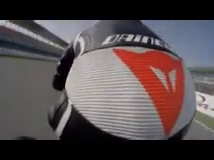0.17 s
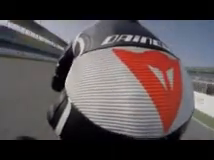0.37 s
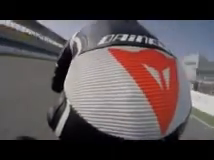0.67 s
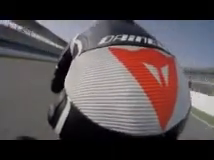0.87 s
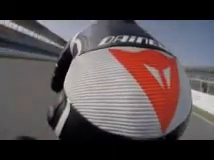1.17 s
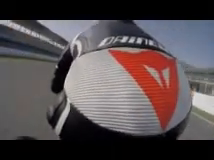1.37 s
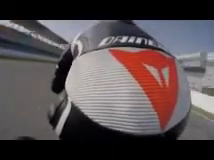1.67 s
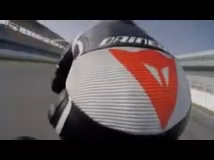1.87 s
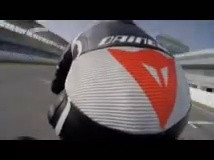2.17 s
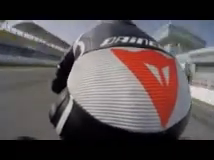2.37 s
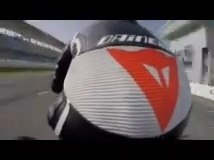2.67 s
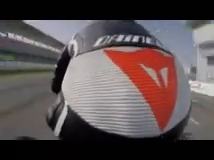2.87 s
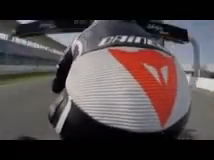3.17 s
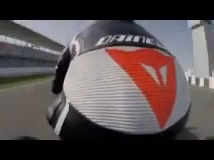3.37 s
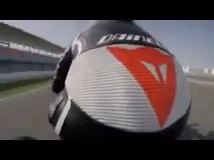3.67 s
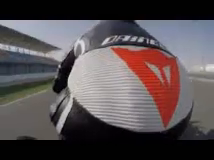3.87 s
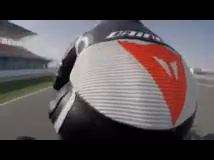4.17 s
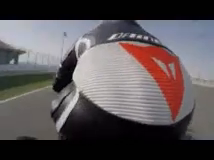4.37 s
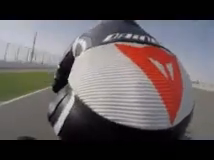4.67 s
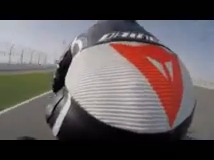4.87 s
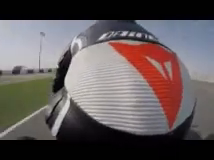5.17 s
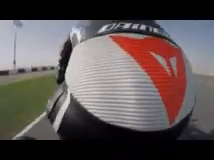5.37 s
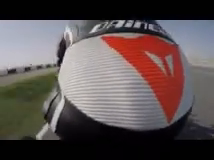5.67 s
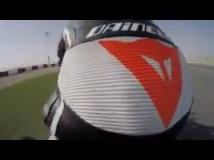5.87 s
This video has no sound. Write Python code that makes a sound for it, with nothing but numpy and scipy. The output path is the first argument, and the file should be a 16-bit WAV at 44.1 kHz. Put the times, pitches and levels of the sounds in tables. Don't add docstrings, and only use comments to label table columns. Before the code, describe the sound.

Close behind a racing motorcycle rider: a hard, raspy engine howl, one abrupt gear change, slowly rising revs, and finally a sputtering throttle-off in rumbling wind.

```python
import sys
import numpy as np
from scipy import signal
from scipy.fft import rfft, irfft, next_fast_len
from scipy.io import wavfile
from scipy.ndimage import uniform_filter1d

SR = 44100
rng = np.random.default_rng(int(sys.argv[2]) if len(sys.argv) > 2 else 0)


def boost_factor(decibels):
    exponent = np.asarray(decibels, float) / 20
    return 10 ** exponent


def bounce(signal):
    frames = np.transpose(np.atleast_2d(signal))
    limited = np.clip(frames, -1, 1)
    pcm = np.round(limited * 32767).astype(np.int16)
    wavfile.write(sys.argv[1], SR, pcm)


N = 265923
T = np.arange(N) / SR


def unit(x):
    return x / np.sqrt(np.mean(x ** 2))


def colour(db_of_hz):
    size = next_fast_len(N)
    hz = np.maximum(np.arange(size // 2 + 1) * SR / size, 1)
    return unit(irfft(rfft(rng.standard_normal(size)) * boost_factor(db_of_hz(hz)), size)[:N])


def shape(table, hz):
    f, db = np.transpose(table)
    return np.interp(np.log(hz), np.log(f), db, left=-90, right=-90)


def bell(s, length):
    return np.exp(-((T - s) / length) ** 2)


def walk(rate):
    steps = np.repeat(rng.standard_normal(int(T[-1] * rate) + 2), 8)
    smooth = uniform_filter1d(uniform_filter1d(steps, 8), 8)
    return np.interp(T * rate * 8, np.arange(len(steps)), unit(smooth))


def tone(phase, db, wobble_db, shake):
    gain = boost_factor(db + wobble_db * (.3 * walk(5) + walk(40)))
    return np.sqrt(2) * gain * np.sin(2 * np.pi * phase + shake * walk(60))


def lift_db(table, hz):
    grid = np.arange(SR // 2)
    lift = sum(db / (1 + (2 * (grid - f) / w) ** 2) for f, w, db in table)
    return np.interp(hz, grid, lift)


# (frequency [Hz], level [dB per Hz])
WIND_RUMBLE = [(12, -26), (22, -20), (40, 0.5), (62, -3), (95, -6), (130, -12), (160, -32), (230, -32)]


def wind(db):
    wheel_hz = 38.5 + 1.2 * walk(4)
    wheel = tone(np.cumsum(wheel_hz) / SR, -5, wobble_db=2, shake=.5)
    gusts = boost_factor(1.2 * walk(10))
    return boost_factor(db) * (gusts * colour(lambda f: shape(WIND_RUMBLE, f)) + wheel)


# (frequency [Hz], level [dB per Hz])
GAS_RUSH = [(105, -35.5), (155, -9.5), (260, -11.5), (410, -9), (910, -10), (1410, -14), (1910, -8),
            (2610, -9.5), (3310, -20.5), (4510, -21), (6010, -26.5), (7110, -33), (8310, -43.5),
            (9100, -54.5)]


def gas_db(hz):
    return shape(GAS_RUSH, hz)


# (time [s], thump level [dB], crack level [dB])
SHIFT_BANGS = [
    (.9065, -34, -20.5),
    (.914, -11, -33),
]
# (time [s], frequency [Hz], level [dB], length [s])
PANEL_RATTLE = [
    (5.63, 1908, -37, .04),
    (5.855, 2035, -32, .022),
    (5.984, 1920, -21.5, .015),
    (6.015, 1872, -30, .018),
    (5.945, 990, -31, .02),
    (5.95, 1960, -30, .02),
    (5.91, 1890, -32, .015),
    (6.0, 790, -33, .025),
]


def knocks():
    out = np.zeros(N)
    hiss = colour(lambda f: gas_db(f) + 1.5 * np.log2(f / 2000) - 8 * (f > 6200))
    for s, thump_db, crack_db in SHIFT_BANGS:
        age = np.maximum(T - s, 0)
        out += boost_factor(thump_db) * np.exp(-age / .016) * np.sin(2 * np.pi * 42 * age)
        out += boost_factor(crack_db) * (T > s) * np.exp(-age / .008) * hiss
    for s, hz, db, length in PANEL_RATTLE:
        out += bell(s, length) * tone(hz * T, db, wobble_db=1.5, shake=.7)
    return out


def clutch(phase):
    return tone(1.292 * phase, -27.5, wobble_db=1, shake=.25)


# (time [s], cycle rate [Hz])
ENGINE_SPEED = [(0, 100.8), (.45, 102.7), (.82, 104.25), (.85, 100.3), (.89, 94.6), (.93, 93.2),
                (.965, 91.2), (1.04, 92.05), (2.6, 94.85), (3.8, 96.65), (5.54, 99.8), (5.585, 98.8),
                (5.63, 94.8), (5.66, 93.6), (5.715, 94.8), (5.8, 93.9), (5.87, 90.8), (6.03, 78)]
# (time [s], rise [Hz], length [s])
TYRE_BUMPS = [
    (.4, .4, .07),
    (1.46, .5, .09),
    (1.74, .35, .08),
    (2.77, .85, .09),
    (3.06, .65, .09),
    (4.74, .6, .08),
    (5.44, .5, .06),
]
# (time [s], swing [Hz], swing rate [Hz], decay [s])
CHAIN_JOLTS = [
    (.7, .9, 5, .08),
    (1.0, .6, 9, .3),
    (2.71, .9, 9, .35),
    (4.7, .5, 9, .2),
    (5.4, .6, 9, .15),
]


def revs():
    hz = np.interp(T, *np.transpose(ENGINE_SPEED)) * (1 + .0007 * walk(18))
    hz = hz + sum(up * bell(s, length) for s, up, length in TYRE_BUMPS)
    for s, swing, rate, decay in CHAIN_JOLTS:
        age = np.maximum(T - s, 0)
        hz = hz + swing * np.exp(-age / decay) * np.sin(2 * np.pi * rate * age)
    return hz


# (closing time [s], closing length [s], opening time [s], opening length [s])
POWER_CUTS = [
    (.832, .01, .904, .004),
    (5.57, .045, 9, .01),
]


def power_cut():
    return sum(np.clip((T - shut) / fall, 0, 1) - np.clip((T - opens) / rise, 0, 1)
               for shut, fall, opens, rise in POWER_CUTS)


# (time [s], swell [dB], length [s])
AFTERFIRE_SWELLS = [
    (.848, 3, .012),
    (.895, -4, .02),
    (5.745, 6.5, .04),
    (5.925, 3.5, .04),
    (6.03, -5, .05),
]


def firing_db(hz, cut):
    afterfire = sum(db * bell(s, length) for s, db, length in AFTERFIRE_SWELLS)
    relit = T - POWER_CUTS[0][2]
    surge = .3 * (relit < 0) * (hz - 102.5)
    flare = 2.5 * (relit > 0) * np.exp(-abs(relit) / .02)
    return cut * (-4 + afterfire) + (1 - cut) * (surge + flare)


# (frequency [Hz], width [Hz], lift [dB])
BODYWORK = [(850, 160, 5), (1900, 260, 6.5), (2250, 190, 0.5), (2450, 100, 4.5), (3860, 510, 7.5),
            (5200, 75, -1), (5230, 300, -3.5), (5970, 250, 1), (5950, 155, 3), (6890, 460, 4),
            (7520, 270, -7.5), (7916, 380, 7)]


def body_db(hz):
    return lift_db(BODYWORK, hz)


def gas_noise(phase, throttle):
    turn = 2 * np.pi * phase
    puff = 1 + .064 * np.cos(turn) + .11 * np.cos(2 * turn + 1.2) + .34 * np.cos(4 * turn + 2.55)
    gas = unit(puff * colour(lambda f: gas_db(f) + body_db(f)))
    hiss_band = signal.butter(1, [4600, 6000], "bandpass", fs=SR, output="sos")
    dull = gas - .6 * signal.sosfilt(hiss_band, gas)
    return throttle * gas + 1.31 * (1 - throttle) * dull


# (multiple of cycle rate [count], level at 97 Hz [dB],
# slope with revs [dB per Hz], level with throttle shut [dB])
FIRING_PATTERN = [(2, -44.1, 0.7, -52), (3, -49.2, -0.3, -54), (4, -24.1, 0.5, -35), (5, -39.0, 0.4, -40),
                  (6, -37.3, -0.4, -43), (7, -35.6, -0.1, -43), (8, -28.1, 0.4, -29), (9, -31.9, 1.0, -49),
                  (10, -31.9, -2.9, -41), (11, -42.2, 1.3, -44), (12, -40.4, -0.8, -37),
                  (13, -44.0, 1.0, -66), (14, -48.9, -0.3, -45), (15, -55.5, 2.1, -54),
                  (16, -43.1, 0.5, -41), (17, -44.7, -0.1, -55), (18, -38.4, 1.5, -46),
                  (19, -43.5, -0.5, -40), (20, -32.7, -0.2, -32), (21, -38.3, -0.5, -47),
                  (22, -33.5, 0.1, -47), (23, -32.7, -1.7, -45), (24, -43.5, -1.8, -37),
                  (25, -43.9, -0.4, -61), (26, -43.5, 0.1, -43), (27, -44.7, -0.5, -46),
                  (28, -47.4, -0.9, -53), (29, -54.7, 0.3, -58), (30, -52.7, -0.8, -54)]
# (frequency [Hz], width [Hz], lift [dB])
PIPE_RESONANCES = [(294, 9, -9), (813, 35, -12), (928, 35, -14), (1168, 41, -14), (1913, 50, 5.5),
                   (1985, 35, -7.3), (2150, 96, -10.7), (2454, 80, 10.6)]


def engine(hz, roar_db, throttle, tone_db):
    phase = np.cumsum(hz) / SR
    lines = 0
    shut = 1 - throttle
    lag = .105
    pull = np.clip(hz, 92.5, 103.4)
    for k, mid_db, slope, shut_db in FIRING_PATTERN:
        lit_db = mid_db + .065 * k + slope * (pull - 97) + lift_db(PIPE_RESONANCES, k * pull)
        db = throttle * lit_db + shut * shut_db + tone_db + .6
        if k == 2:
            db = db + .8 * np.clip(101 - hz, 1, 7)
        if k > 13:
            db = db - .7 * (np.maximum(91 - hz, 0) + shut * np.maximum(hz - 95, 0))
        rough = .35 + (0 if k == 4 else min(.25 + k / 16, 1.3))
        rough = rough * (2.6 - 1.6 * throttle)
        wander = .12 * walk(1.5)
        lines = lines + tone(k * phase + lag * k ** 2 + wander, db, wobble_db=rough, shake=.17 * rough)
    for k in range(31, 60):
        db = -56.5 + .5 * (k % 2 == 0) - .25 * (k - 31) + body_db(k * hz) - 5 * shut
        lines = lines + tone(k * phase + lag * k ** 2, db + tone_db, wobble_db=3, shake=.6)
    return lines + boost_factor(roar_db - .82) * gas_noise(phase, throttle) + clutch(phase)


# (time [s], roar level [dB], wind level [dB])
RIDE_LEVELS = [
    (0, -26.5, -25.5),
    (.8, -26.5, -25),
    (1, -26.5, -23.5),
    (2, -27.5, -25),
    (3, -27.5, -24.5),
    (4, -26.5, -22.5),
    (5, -25.5, -23),
    (5.57, -26, -22.5),
    (6.03, -27.5, -20.5),
]


def scene():
    time, roar, gusting = np.transpose(RIDE_LEVELS)
    cut, hz = power_cut(), revs()
    braking = np.maximum(T - POWER_CUTS[1][0], 0)
    roar_db = np.interp(T, time, roar) - 5.5 * cut + 15 * braking
    wind_db = np.interp(T, time, gusting) + cut * (braking > 0) - 5.5 * bell(5.79, .036)
    motor = engine(hz, roar_db, 1 - cut, firing_db(hz, cut))
    return (wind(wind_db) + knocks() + motor)[None]


def starve(x, margin_db, tilt_db):
    hz, _, spec = signal.stft(x, SR, nperseg=2048)
    bands = spec[:1024].reshape(256, 4, -1)
    power = uniform_filter1d(np.mean(abs(bands) ** 2, axis=1), size=2, axis=1)
    around = np.exp(uniform_filter1d(np.log(np.mean(power, axis=1) + 1e-18), size=13))
    centre = hz[:1024:4] + 40
    limit_db = tilt_db * np.log2(centre / 7500) - margin_db
    limit = (around * boost_factor(2 * limit_db) * (centre > 4400))[:, None]
    loud = np.mean(power[60:85], axis=0)
    limit = limit * (loud / np.median(loud)) ** .9
    keep = 1 / (1 + np.minimum(limit / (power + 1e-18), 10) ** 24)
    kept = (bands * keep[:, None]).reshape(1024, -1)
    return signal.istft(np.vstack([kept, spec[1024:]]), SR, nperseg=2048)[1][:N]


def top_cut(x):
    return signal.sosfilt(signal.butter(12, 8530, fs=SR, output="sos"), x)


def record(dry):
    rounded = np.tanh(1.25 * dry[0]) / 1.25
    mix = starve(rounded, margin_db=1.2, tilt_db=6)[None]
    return top_cut(mix)


dry = scene()
out = record(dry)
bounce(out)
```